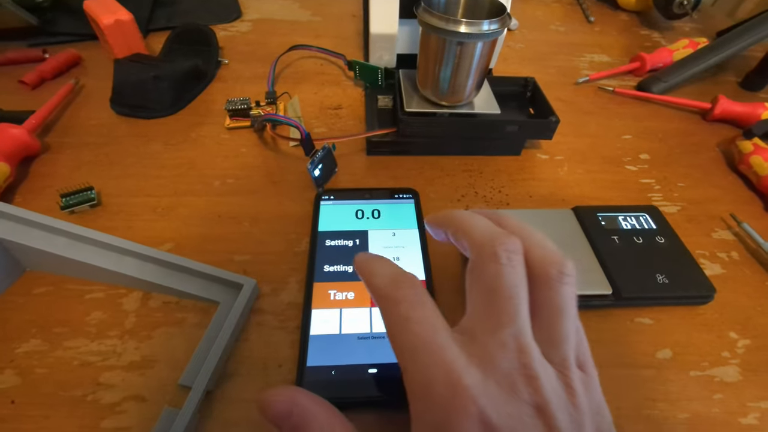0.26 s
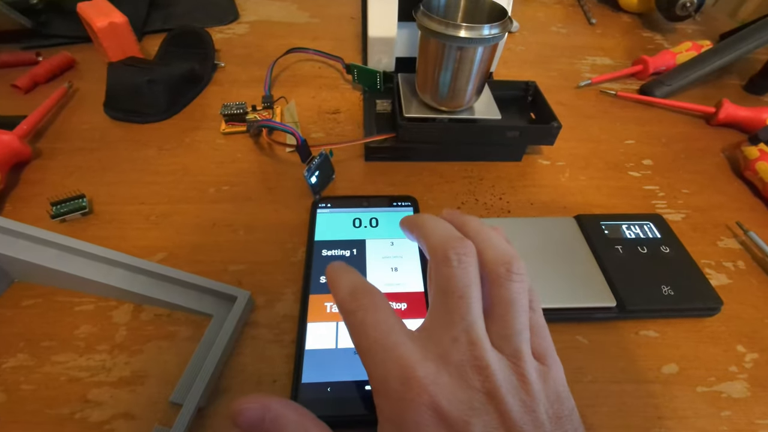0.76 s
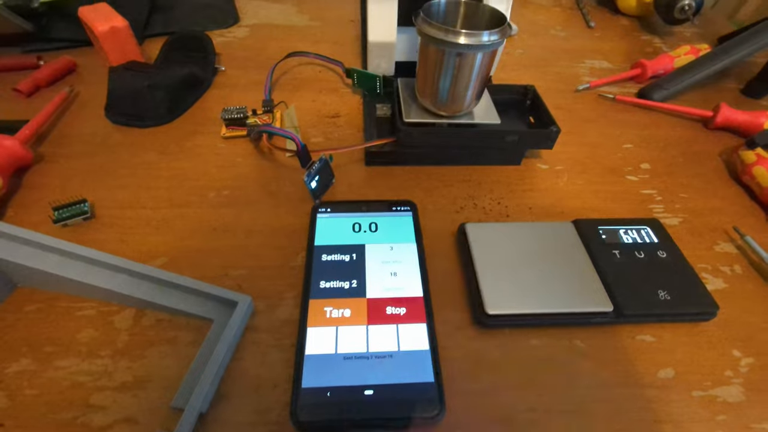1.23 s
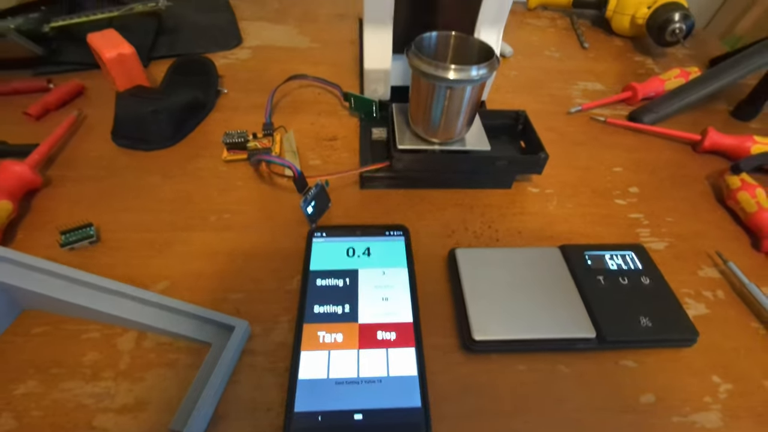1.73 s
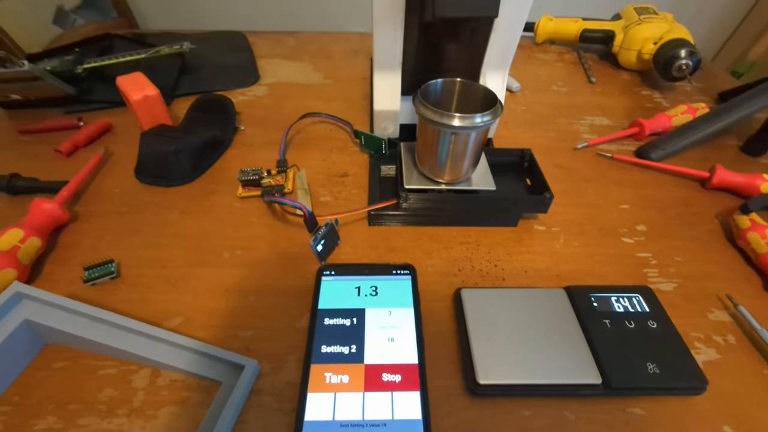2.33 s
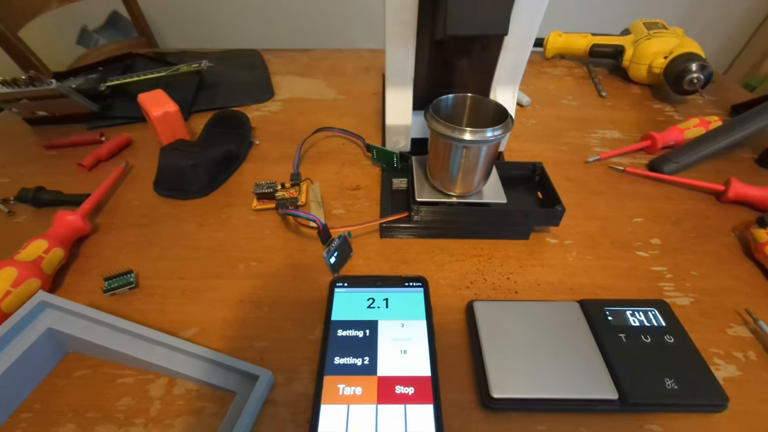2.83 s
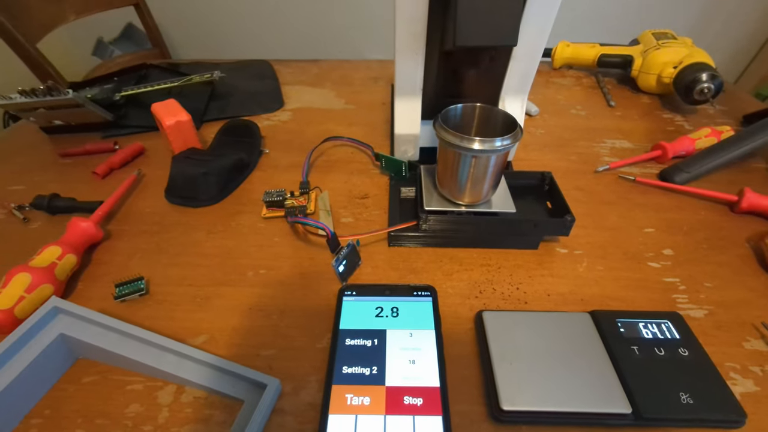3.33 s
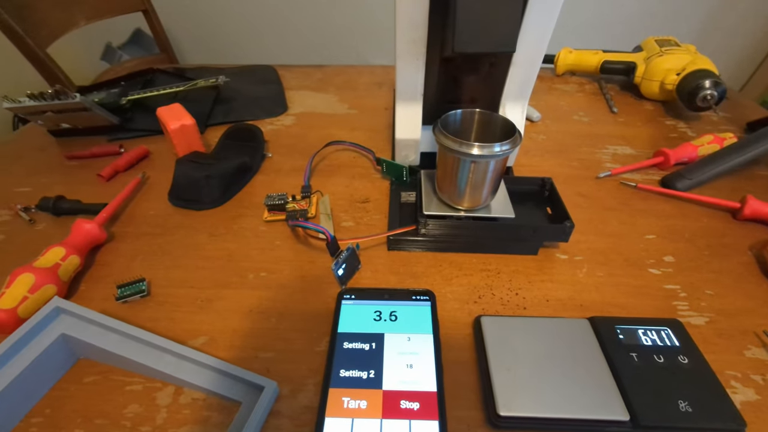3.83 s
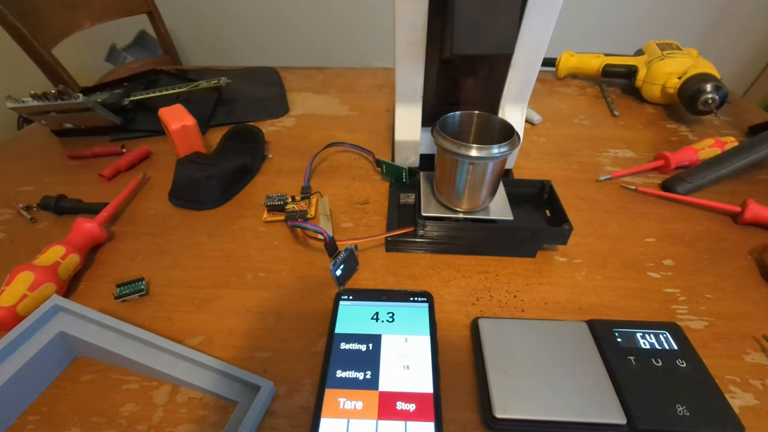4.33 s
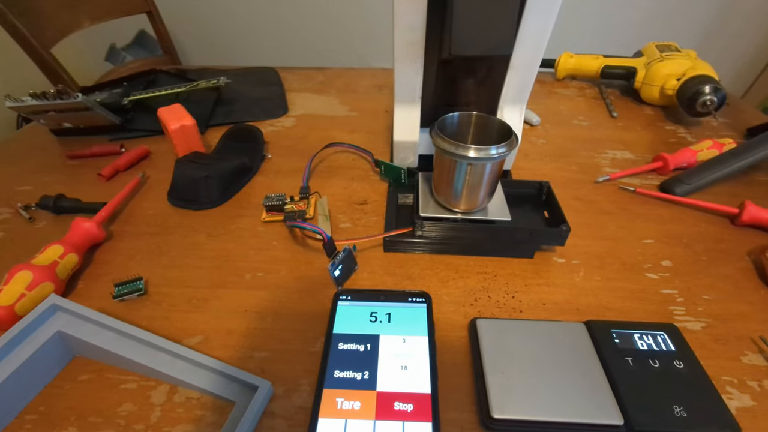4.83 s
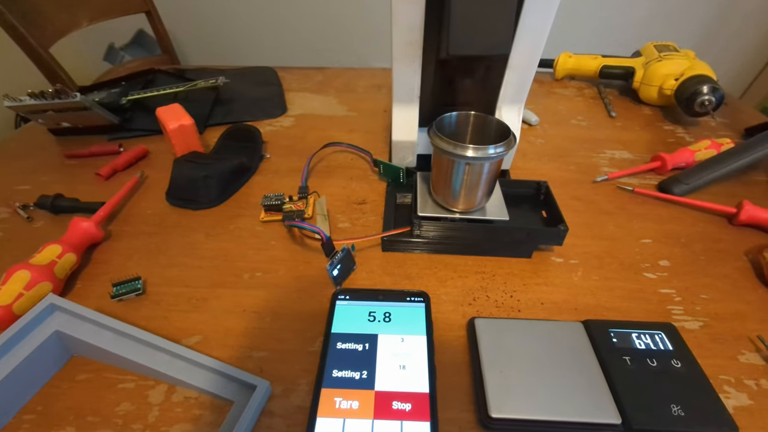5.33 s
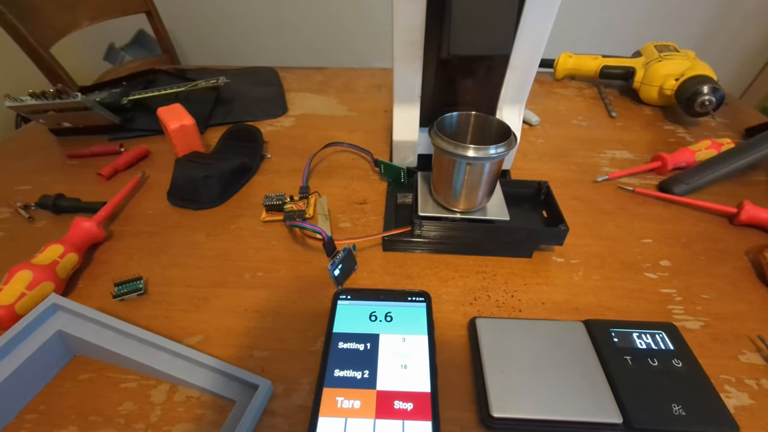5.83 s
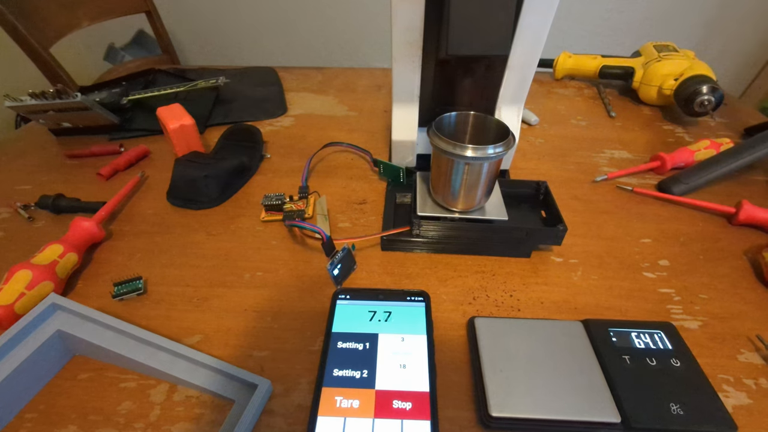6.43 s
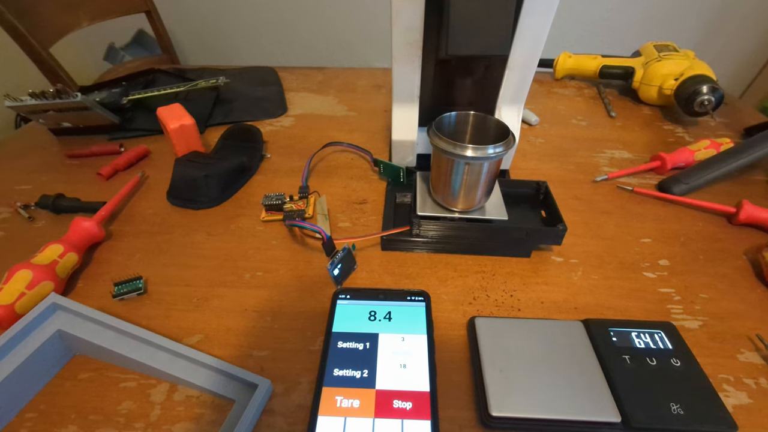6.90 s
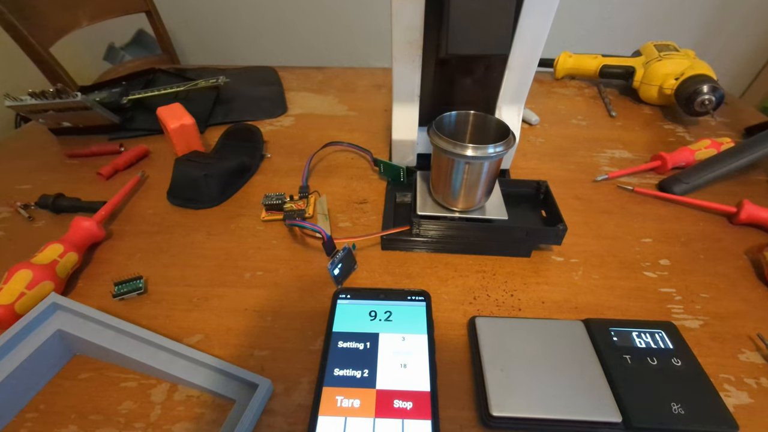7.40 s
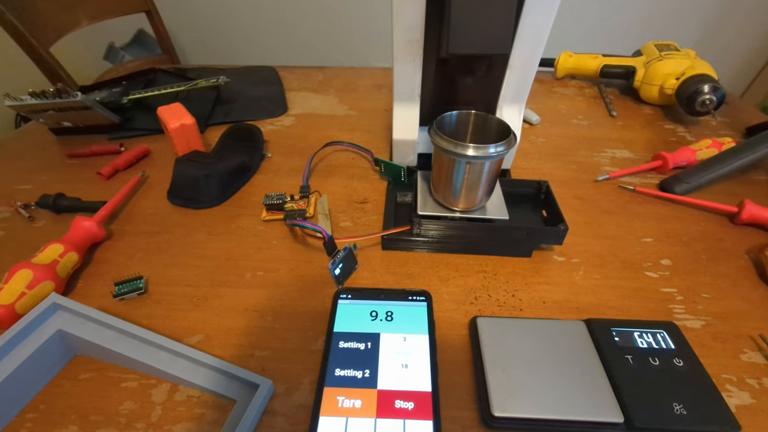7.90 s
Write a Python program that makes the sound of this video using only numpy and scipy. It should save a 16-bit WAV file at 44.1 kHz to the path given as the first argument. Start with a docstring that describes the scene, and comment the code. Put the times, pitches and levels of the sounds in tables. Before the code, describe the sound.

After a second of near-silent room tone, an electric coffee grinder clicks on, lurches with a brief squeal, then crunches beans loudly and steadily.

```python
"""A quiet room murmurs and a hand rubs softly; then a coffee grinder clicks on, lurches and crunches beans.
Bursts of random cracks and steady powder noise ring the housing through a bank of resonances.
Unsteady tones make the squeal and whine, filtered noise the whirr, and a low sine the motor's hum.
Short fading tones make beans knock in the hopper, and brief noise ticks make the switch and hard beans snap.
A short echo tail and a fading bench reflection place the close stereo microphone."""
import sys
import numpy as np
from scipy import signal
from scipy.fft import rfft, irfft
from scipy.io import wavfile
from scipy.ndimage import uniform_filter1d, minimum_filter1d

SR = 44100
rng = np.random.default_rng(int(sys.argv[2]) if len(sys.argv) > 2 else 0)


def generate_wav(signal):
    """Clip the signal to [-1, 1] and save it as 16-bit WAV at the path in sys.argv[1]."""
    frames = np.transpose(np.atleast_2d(signal))
    scaled = np.clip(frames, -1, 1) * 32767
    pcm = np.round(scaled).astype(np.int16)
    wavfile.write(sys.argv[1], SR, pcm)


N = 359856

# how full the burrs are, as a level before each part's offset: start_s, level_db
BURR_LOAD = [(1.1, -25.0), (1.2, -26), (1.38, -26), (1.46, -27), (1.88, -25), (1.98, -26.5), (2.06, -25.5),
             (2.14, -26), (2.6, -25.5), (2.88, -26.5), (3.18, -25), (3.28, -26), (3.36, -25.5),
             (3.56, -27.0), (3.74, -25.5), (3.82, -26.5), (3.9, -25.5), (4.32, -26.0), (4.74, -24.5),
             (4.82, -25.5), (5.2, -26.5), (5.38, -25.0), (5.46, -26), (5.54, -24.5), (5.64, -26),
             (5.96, -25.5), (6.1, -26.5), (6.24, -25.5), (6.46, -26.0), (6.7, -25.0), (6.88, -26),
             (7.04, -24.5), (7.28, -27.5), (7.66, -24.5), (7.74, -26.0), (8.12, -26.0)]
# throb of the housing near 290 Hz, before its offset: start_s, level_db
HOUSING_THROB = [(1.1, -40.5), (1.2, -46.5), (1.64, -44.5), (1.7, -37), (1.86, -45.5), (1.96, -41.5),
                 (2.16, -45.0), (2.26, -41.5), (2.38, -49.5), (2.46, -46), (2.76, -48.5), (2.84, -41),
                 (3.12, -46), (3.18, -50.0), (3.38, -47), (3.56, -53.5), (3.7, -44), (3.84, -50),
                 (3.9, -43.5), (4.0, -49.5), (4.28, -47), (4.34, -53), (4.42, -45), (4.62, -47),
                 (4.88, -45), (5.32, -51), (5.4, -45.5), (5.78, -49), (5.84, -46.0), (6.1, -47),
                 (6.16, -52), (6.32, -44.5), (6.52, -42), (6.64, -55), (6.72, -47), (6.94, -47),
                 (7.48, -47.5), (7.7, -46.5), (8.02, -45.5), (8.12, -50)]
# thin squeal while the first beans feed in, before the start-up gain: start_s, pitch_hz, level_db
SQUEAL_PATH = [(1.1, 1460, -47), (1.25, 1478, -35), (1.38, 1464, -24.5), (1.47, 1415, -35),
               (1.54, 1318, -31), (1.68, 1353, -34), (1.78, 1440, -32), (1.88, 1465, -27), (2.1, 1485, -59)]
# broad colour of the housing, only relative levels matter: pitch_hz, left_db, right_db
HOUSING_COLOUR = [(20, -59, -56), (60.3, -52, -50), (110, -42, -40.0), (160, -43, -43.5),
                  (300, -31.5, -33.0), (450, -37, -37), (874, -38.5, -37.5), (1147, -26.0, -30.5),
                  (1393, -21.5, -24.5), (2190, -28.0, -37.0), (3313, -27.0, -36.0), (3590, -37.5, -40.0),
                  (6900, -33.0, -39.5), (9800, -42, -43.5), (14500, -45.5, -43.5), (15400, -49.5, -51)]
# resonances of the housing: pitch_hz, width_hz, left_lift_db, right_lift_db
HOUSING_RESONANCES = [(138.5, 17, 10, 9.0), (189, 26, 10, 7), (252.4, 11, 3, 3), (278.9, 21, 12, 12.5),
                      (303.7, 13, 4.5, 6.5), (329, 14, -2.5, 4), (368, 25, 4, 5.5), (482, 34, 4.5, 0.5),
                      (565, 22, 5.5, 3), (736, 17, 5.5, 5.0), (770, 41, 5.0, 1.5), (961.7, 52, 12.0, 8.5),
                      (1006, 15, 7, 4.5), (1088, 17, 3.5, 6.5), (1282, 81, 6.5, 2), (1341, 78, 8, 9.5),
                      (1447, 83, 6.5, 1.5), (1519, 46, 10.0, 8.5), (1555, 24, 7.0, 0.5), (1615, 66, 9, 9.5),
                      (1725, 102, 9.0, 8.0), (1821, 94, 8.5, 6.5), (1901, 103, 8.5, 7.5),
                      (2020, 32, 5.5, 9.0), (2100, 107, 6.5, 7.0), (2199, 110, 10.5, 8.5),
                      (2279, 83, 11.0, 14), (2378, 118, 7.5, 4.0), (2526, 109, 4.5, 8),
                      (2714, 112, 10.0, 4.5), (2774, 77, 3.0, 10.5), (2972, 47, 9, 0.5),
                      (3047, 163, 5.0, 6.0), (3161, 53, 10.5, 8), (3256, 81, -0.5, 4.5),
                      (3396, 121, 6.0, 5), (3550, 26, 4.5, 0.0), (3670, 173, 7.0, 1.5),
                      (3976, 150, 10.5, 6.5), (4226, 94, 13.5, 7), (4650, 211, 10.5, 6.0),
                      (4890, 197, -0.5, 8.5), (5060, 225, 9, 7.0), (5326, 240, 14.5, 7),
                      (5736, 50, 3.5, 0.0), (6200, 63, 5, 4.0), (6513, 240, 6.5, 6.0), (6790, 249, 4.5, 4),
                      (7040, 163, 4, 7), (7700, 327, 3.5, -1.5), (8280, 210, 5.5, 1.0),
                      (8495, 390, 6.5, 0.0), (10720, 377, 8.0, 4.5), (11960, 431, 6, 3),
                      (13476, 285, 3, 3.5), (14296, 243, 5.5, 2.5)]
# whole beans knocking in the hopper, before a shared offset: start_s, level_db, pitch_hz
HOPPER_KNOCKS = [(1.7, -41, 285), (2.825, -41, 468), (2.99, -39.5, 400), (2.997, -43, 610),
                 (4.128, -37.5, 527), (4.352, -39, 497), (4.4, -39, 400), (4.495, -38, 530),
                 (5.215, -41, 570), (5.24, -37.5, 365), (5.34, -38, 360), (5.365, -40, 470),
                 (5.41, -39, 574), (5.495, -38.5, 561), (5.555, -37, 730), (5.58, -41, 616),
                 (5.795, -41, 557), (6.285, -39.5, 460), (6.495, -39, 345), (6.69, -40, 387),
                 (6.772, -35, 560), (7.199, -43, 550), (7.64, -43, 420)]
# ticks of the switch, then of hard beans, before a shared offset: start_s, level_db
SNAP_TICKS = [(1.0438, -42), (2.7531, -40), (3.239, -25), (3.456, -34), (4.295, -36), (6.4946, -35),
              (7.1606, -28)]
# how alike left and right are before the housing rings: pitch_hz, correlation (-1 to 1)
SIDE_LIKENESS = [(60, 0.18), (120, 0.91), (290, 0.96), (520, 0.65), (980, 0.72), (1150, 0.15), (1520, 0.17),
                 (1660, 0.93), (1860, 0.78), (2020, 0.41), (2180, 0.42), (2420, -0.072), (2560, 0.55),
                 (2900, -0.24), (3380, 0.3), (3900, -0.027), (5000, -0.25), (5300, -0.6), (5850, 0.078),
                 (7200, -0.16), (8000, 0.17), (9000, -0.12), (15000, 0.028)]
# colour of the room's air, only relative levels matter: pitch_hz, level_db
ROOM_COLOUR = [(15, -48), (25, -22), (70, -11), (98, -3), (146, -7), (202, -16), (264, -10), (286, -10),
               (315, -11), (335, -6), (365, -8), (404, -20), (588, -25.5), (749, -32), (1060, -35),
               (1210, -26.5), (1810, -43.5), (15000, -57)]
# faint appliance tones in the room, before a shared offset: pitch_hz, level_db
APPLIANCE_TONES = [(93, -78), (145.3, -77), (296.8, -72.5), (331, -78), (341.6, -70), (1200, -100)]
# share of the energy that is steady powder rubbing, not cracks: pitch_hz, share (0 to 1)
POWDER_SHARE = [(300, 0.44), (1600, 0.74), (3200, 0.63), (6000, 0.6), (12000, 0.59)]
# drive clacks in and rattles, burrs catch, slip and bite: start_s, gain_db
START_GAIN = [(1.04, -50), (1.043, -20), (1.0445, -9), (1.051, -21), (1.055, -14), (1.07, -8),
              (1.075, -1.5), (1.079, 0), (1.084, -6), (1.088, 0), (1.15, 0.5)]
# narrow tones scraped out by the burrs, before a shared offset: pitch_hz, left_db, right_db
WHINE_TONES = [(1349, -47, -51), (1526, -50, -51), (2207, -46, -58), (2280, -45, -53), (3162, -52, -66),
               (4170, -64, -67), (5340, -52, -66)]
# colour while the microphone points down at the bench: pitch_hz, gain_db
DOWNWARD_COLOUR = [(20, 0.5), (3500, 0), (4650, -1.5), (5000, 1), (5350, -2.5), (5700, 0.5), (6500, 0),
                   (7000, -2), (7600, -1), (8000, 1), (9400, 2), (9850, -2), (10500, 0), (13000, 0.5),
                   (15000, 1.5)]

T = np.arange(N) / SR  # time in seconds
FREQ = np.maximum(np.arange(N // 2 + 1) * SR / N, 1)  # spectrum pitches in Hz
SWITCH_S = START_GAIN[0][0]
FILLED_S = 1.2  # when the whirr begins to fade and the whine begins to rise


def undb(db):
    """Turn decibels into a gain."""
    return 10 ** (np.asarray(db) / 20)


def unit(x):
    """Scale to an average strength (rms) of 1."""
    return x / np.sqrt(np.mean(x ** 2))


def curves(table):
    """Join each column of a table by straight lines in time."""
    s, *columns = np.transpose(table)
    return [np.interp(T, s, c) for c in columns]


def spectra(table):
    """Join each column of a table by straight lines in log frequency."""
    hz, *columns = np.transpose(table)
    return np.array([np.interp(np.log(FREQ), np.log(hz), c) for c in columns])


def band(x, lo_hz, hi_hz, order=3):
    """Keep only the pitches between two limits."""
    top_hz = min(hi_hz, SR / 2 - 100)
    sos = signal.butter(order, [lo_hz, top_hz], "band", fs=SR, output="sos")
    return signal.sosfilt(sos, x)


def ring(x, db):
    """Apply a gain per frequency so that resonances ring after each click, never before it."""
    cepstrum = irfft(np.log(undb(db)), N)
    # folding the cepstrum forward in time gives a minimum-phase filter
    cepstrum[..., 1:N // 2] *= 2
    cepstrum[..., N // 2 + 1:] = 0
    return irfft(rfft(x) * np.exp(rfft(cepstrum)), N)


def walk(rate):
    """Wander smoothly at random, with an rms of 1 and `rate` new values a second."""
    k = max(int(SR / rate), 1)
    held = np.repeat(rng.standard_normal(N // k + 1), k)
    smooth = uniform_filter1d(uniform_filter1d(held, k), k)
    return unit(smooth[:N])


def decay(x, seconds):
    """Give each impulse an exponential tail."""
    return signal.lfilter([1], [1, -np.exp(-1 / (seconds * SR))], x)


def stereo(pair, likeness):
    """Mix two unrelated sounds into left and right with a given correlation."""
    c = np.clip(likeness, -1, 1)
    mid, side = rfft(pair) * np.sqrt([(1 + c) / 2, (1 - c) / 2])
    return irfft([mid + side, mid - side], N)


def impulses(rate, scatter_db):
    """Make randomly timed impulses of uneven size, about `rate` a second."""
    hits = rng.random(N) < rate / SR
    return hits * undb(scatter_db * rng.standard_normal(N))


def fractures(bean_rate, bean_s, chip_rate, chip_s, crack_rate):
    """Breaking beans and chips swell a spray of tiny cracks; powder rubs steadily between the burrs."""
    crushing = decay(impulses(bean_rate, scatter_db=-1.0), bean_s) + 1e-6
    # the burrs take in only so many beans at a time, which evens out the crushing over 50 ms
    crushing = crushing / uniform_filter1d(crushing, size=SR // 20)
    chipping = decay(impulses(chip_rate, scatter_db=1.5), chip_s)
    cracks = np.array([impulses(crack_rate, scatter_db=2.0) * rng.choice([-1, 1], N) for _ in range(2)])
    cracks = unit(np.sqrt(crushing * chipping) * cracks)
    powder = rng.standard_normal((2, N))
    share = np.clip(spectra(POWDER_SHARE)[0], 0, 1)
    return irfft(np.sqrt(1 - share) * rfft(cracks) + np.sqrt(share) * rfft(powder), N)


def shifting(x, shift_db, rate):
    """Beans break at changing places around the burrs, so each pitch range swells and fades on its own."""
    centres = np.log(np.geomspace(900, 9000, num=12))
    spectrum = rfft(x)
    out = 0
    for own in np.eye(len(centres)):
        share = np.interp(np.log(FREQ), centres, own)  # overlapping triangles that add up to 1
        out = out + irfft(spectrum * share, N) * undb(shift_db * walk(rate))
    return out


def reflections(x, t60, wet_db):
    """Add the short diffuse tail of the bench and walls, which falls 60 dB in t60 seconds."""
    t = T[:SR // 2]
    tail = rng.standard_normal((2, len(t))) * 1000 ** (-t / t60) * (t > .002)
    tail *= undb(wet_db) / np.sqrt(np.sum(tail ** 2, axis=1, keepdims=True))
    return x + signal.fftconvolve(x, tail, axes=1)[:, :N]


def housing_db():
    """The housing's gain towards each side: its broad colour changed around each resonance."""
    lifts = 0
    for hz, width, left, right in HOUSING_RESONANCES:
        peak = 1 / (1 + (2 * (FREQ - hz) / width) ** 2)
        lifts = lifts + np.array([[left], [right]]) * peak
    return spectra(HOUSING_COLOUR) + lifts


def grinding(crunch_db, splinter_db, rumble_db, shake_db, crunch_follow):
    """Fractures ring the housing; load sets rumble, crunch and splinters, while the body throbs on its own."""
    feed_rate_hz, feed_flutter_db = 14, 0.19  # single beans make the load flutter at random
    ripple_hz, ripple_depth = 100.5, 0.057  # the motor's torque pulses
    load = curves(BURR_LOAD)[0] + feed_flutter_db * walk(feed_rate_hz)
    shake, = curves(HOUSING_THROB)
    crunch = load.mean() + crunch_follow * (load - load.mean())

    force = fractures(bean_rate=150, bean_s=0.013, chip_rate=700, chip_s=0.002, crack_rate=11000)
    force = shifting(force, shift_db=0.91, rate=14)
    force = force * (1 + ripple_depth * np.sin(2 * np.pi * ripple_hz * T))
    force = reflections(force, t60=0.17, wet_db=-10.5)
    ringing = ring(stereo(force, spectra(SIDE_LIKENESS)[0]), housing_db())

    # split by pitch, then set each part's level over time
    spectrum = rfft(ringing)
    low = 1 / (1 + (FREQ / 800) ** 12)
    body = 1 / (1 + ((FREQ - 290) / 48) ** 6)
    high = 1 / (1 + (3700 / FREQ) ** 10)
    parts = [(low - body, load + rumble_db), (body, shake + shake_db),
             (1 - low - high, crunch + crunch_db), (high, load + splinter_db)]
    return sum(unit(irfft(spectrum * share, N)) * undb(db) for share, db in parts)


def squeal(jitter, right_db):
    """An unsteady rubbing tone that sags and recovers as the burrs fill."""
    hz, db = curves(SQUEAL_PATH)
    tone = np.sin(2 * np.pi * np.cumsum(hz * (1 + jitter * walk(250))) / SR)
    return unit(tone * undb(3.2 * walk(60.1))) * undb(db) * undb([[0], [right_db]])


def whirr(lo_hz, hi_hz, whirr_db, right_db):
    """Bright rubbing of the still empty burrs, louder on the left, that dies away as grounds damp them."""
    fade_db_per_s = 9
    db = whirr_db - fade_db_per_s * np.maximum(T - FILLED_S, 0)
    noise = unit(band(rng.standard_normal((2, N)), lo_hz, hi_hz, order=2))
    return noise * undb(db) * undb([[0], [right_db]])


def whine(whine_db, jitter, flutter_db):
    """The filled burrs scrape a few narrow, unsteady tones out of the housing."""
    rise_s = 0.98
    out = 0
    for hz, left, right in WHINE_TONES:
        tone = np.sin(2 * np.pi * np.cumsum(hz * (1 + jitter * walk(120))) / SR)
        out = out + unit(tone * undb(flutter_db * walk(25))) * undb([[left], [right]])
    return out * undb(whine_db) * np.clip((T - FILLED_S) / rise_s, 0, 1)


def motor():
    """The motor's hum builds as it comes up to speed and flutters slightly at random."""
    hum_hz, hum_db, rise_s = 120, -52, 0.1  # level before flutter and the start-up gain
    tone = np.sin(2 * np.pi * hum_hz * T + 0.14 * walk(8.7))
    speed = 1 - np.exp(-np.maximum(T - SWITCH_S, 0) / rise_s)
    return unit(tone) * speed * undb(hum_db + .6 * walk(16))


def spin_up():
    """Gain of the mill: silent until the switch closes, then a lurching start."""
    return undb(curves(START_GAIN)[0]) * (T > SWITCH_S)


def bite(lo_hz, hi_hz, right_db):
    """The first bean gives way with a hard crunch in the middle pitches."""
    bite_s, fall_s, bite_db = 1.086, 0.04, -24.5  # level at the onset, on the left
    age = T - bite_s
    crunch = unit(band(rng.standard_normal(N), lo_hz, hi_hz, order=2))
    return crunch * (age > 0) * np.exp(-np.abs(age) / fall_s) * undb(bite_db) * undb([[0], [right_db]])


def snaps(snap_db, fall_s):
    """Each snap is one short, bright tick of fading noise."""
    blows = np.zeros(N)
    for s, db in SNAP_TICKS:
        blows[int(s * SR)] = undb(db + snap_db)
    return band(decay(blows + 1e-18, fall_s) * rng.standard_normal((2, N)), 5500, 9700, order=1)


def knocks(knock_db, fall_s, spread, tumble_db, thump_hz, thump_db):
    """A bean hits the hopper: a hollow knock, a low thump of the housing and a short noisy tumble."""
    out = np.zeros(N)
    age = T[:SR // 4]
    for s, db, hz in HOPPER_KNOCKS:
        noise = rng.standard_normal(len(age))
        tumble = unit(band(noise, hz / (1 + spread), hz * (1 + spread), order=2))
        thump = np.sin(2 * np.pi * thump_hz * age)
        knock = np.sin(2 * np.pi * hz * age) + undb(thump_db) * thump + undb(tumble_db) * tumble
        at = int(s * SR)
        out[at:at + len(age)] += knock * np.exp(-age / fall_s) * undb(db + knock_db)
    return band(out, 140, 1300, order=2)


def bench(x):
    """The microphone points down, with a different colour and a bench reflection, until it tilts up."""
    lag_ms, first_strength = 0.92, 0.14
    tilt_s, tilt_length_s = 1.84, 0.72
    down = np.clip(1 - (T - tilt_s) / tilt_length_s, 0, 1)
    x = (1 - down) * x + down * ring(x, spectra(DOWNWARD_COLOUR)[0])
    strength = first_strength * down
    late = np.array([np.interp(T - lag_ms / 1000, T, side) for side in x])
    return (x + strength * late) / np.sqrt(1 + strength ** 2) * (T > SWITCH_S)


def rub(lo_hz, hi_hz):
    """A faint, soft rub of the hand just before the start: noise that swells and dies away."""
    rub_s, attack_s, fall_s, rub_db = 0.66, 0.04, 0.17, -80  # level before the swell
    age = np.maximum(T - rub_s, 0)
    swell = np.minimum(age / attack_s, 1) * np.exp(-age / fall_s)
    return unit(band(rng.standard_normal(N), lo_hz, hi_hz, order=2)) * swell * undb(rub_db)


def room_tone(air_db, tones_db):
    """A low murmur of air, more alike on both sides at low pitch, with a few faint appliance tones."""
    noise = ring(rng.standard_normal((2, N)), spectra(ROOM_COLOUR)[0])
    air = stereo(noise, 1 / (1 + (FREQ / 700) ** 2))
    tones = sum(undb(db) * np.sin(2 * np.pi * hz * T + 0.3 * walk(3.8)) for hz, db in APPLIANCE_TONES)
    return unit(air) * undb(air_db) + undb(tones_db) * tones


def scene():
    """The grinder starts, reflected by the bench, over the hand rub and room tone."""
    burrs = grinding(crunch_db=1.5, splinter_db=-8.0, rumble_db=-22, shake_db=0.1, crunch_follow=1.0)
    burrs = burrs + squeal(jitter=0.011, right_db=-9)
    burrs = burrs + whirr(lo_hz=5680, hi_hz=6440, whirr_db=-38.5, right_db=-16)
    burrs = burrs + whirr(lo_hz=11150, hi_hz=11500, whirr_db=-52, right_db=-12)
    burrs = burrs + whine(whine_db=-1.0, jitter=0.003005, flutter_db=5.5)
    mill = (burrs + motor()) * spin_up()
    mill = mill + bite(lo_hz=1520, hi_hz=1950, right_db=-8)
    mill = mill + snaps(snap_db=5.0, fall_s=0.0025)
    mill = mill + knocks(knock_db=-1.0, fall_s=0.025, spread=0.29, tumble_db=-4, thump_hz=190, thump_db=-9)
    return bench(mill) + rub(lo_hz=1200, hi_hz=1420) + room_tone(air_db=-70, tones_db=-0.5)


def record(dry):
    """A quick limiter holds down the highest peaks; the recorder cuts the top."""
    ceiling, top_hz = .31, 15720  # ceiling as a share of full scale
    room_left = ceiling / np.maximum(np.abs(dry).max(axis=0), ceiling)
    gain = uniform_filter1d(minimum_filter1d(room_left, size=SR // 500), size=SR // 500)
    return signal.sosfilt(signal.ellip(10, .1, 80, top_hz, fs=SR, output="sos"), dry * gain)


dry = scene()
out = record(dry)
generate_wav(out)
```